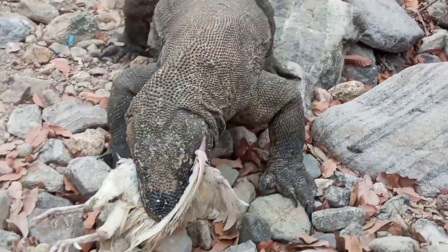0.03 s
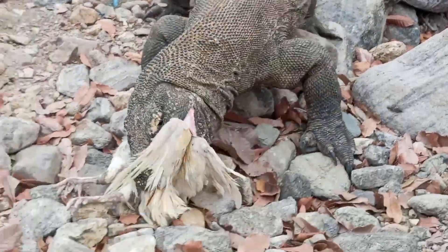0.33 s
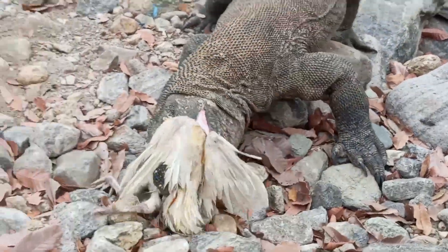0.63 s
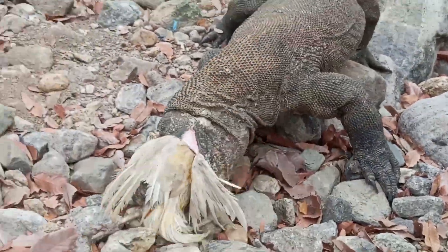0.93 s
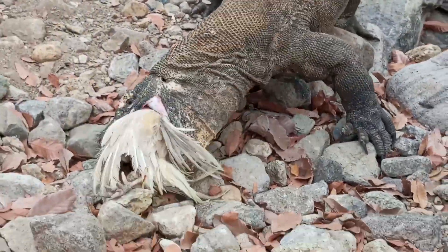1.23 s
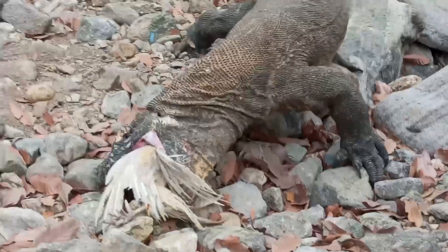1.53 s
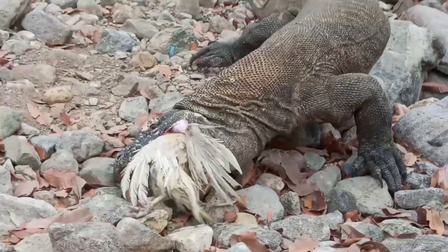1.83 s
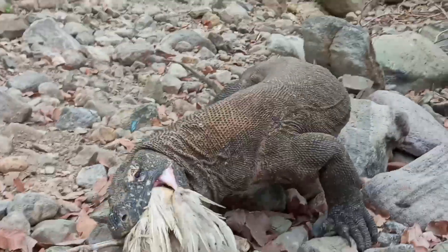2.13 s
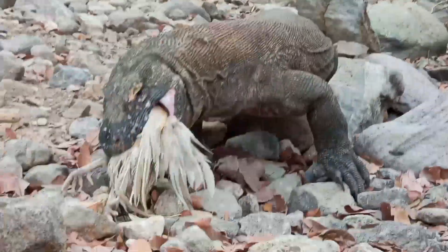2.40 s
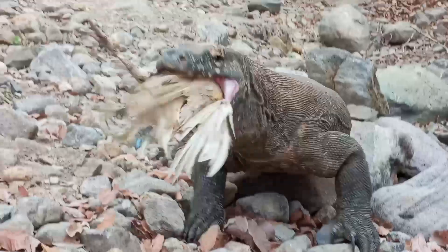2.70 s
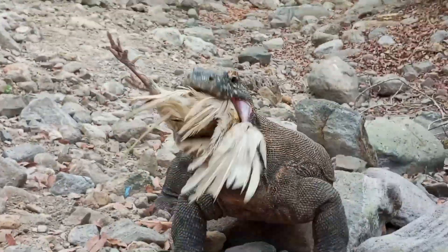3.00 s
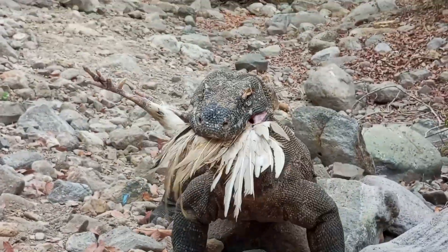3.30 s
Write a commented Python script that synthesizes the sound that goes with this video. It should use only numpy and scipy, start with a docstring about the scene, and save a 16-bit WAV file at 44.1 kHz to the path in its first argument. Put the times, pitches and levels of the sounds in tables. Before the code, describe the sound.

A large lizard scuffs and rustles over stones and dry leaves close by, dragging a dead bird in uneven shoves. Stones clack and twigs snap around 0.2 seconds, and leaves crackle sharply near 0.9. Gritty scraping continues, with soft low thuds and stone knocks at about 2 seconds. More cracks, scuffs and dull thumps follow from 2.5 to 3.2 as it swings the bird up, then ease over faint outdoor air.

```python
"""Outdoors, on loose stones and dry leaves, a large lizard close by hauls a dead bird, then swings it up.
Each shove of feet, belly and feathers is a scuff made of many tiny slips. Leaves and twigs crack,
stones knock together and the heavy body thuds on the ground. Nearby rocks bounce the sharper
sounds back, and faint outdoor air lies under it all."""
import sys
import numpy as np
from scipy import signal
from scipy.fft import rfft, irfft, next_fast_len
from scipy.io import wavfile
from scipy.ndimage import uniform_filter1d, map_coordinates

SR = 44100
rng = np.random.default_rng(int(sys.argv[2]) if len(sys.argv) > 2 else 0)


def output_pcm(signal):
    """Save a mono or channel-first signal as 16-bit PCM at the path in sys.argv[1].

    Samples are clipped to [-1, 1] before scaling.
    """
    pcm = np.clip(np.atleast_2d(signal).T, -1, 1) * 32767
    wavfile.write(sys.argv[1], SR, np.round(pcm).astype(np.int16))


N = 156555
SIZE = 8192  # samples in one short sound or filter


def amp(db):
    """Turn decibels into a gain."""
    return 10 ** (np.asarray(db) / 20)


def unit(x):
    """Scale a sound to a standard strength (rms 1)."""
    return x / np.sqrt(np.mean(x ** 2) + 1e-20)


def along(points, hz):
    """Read between the points of a tone curve."""
    f, db = np.transpose(points)
    return np.interp(np.log(hz + 1), np.log(f + 1), db)


def octaves(hz, centre_hz):
    """Distance from a centre pitch."""
    return np.log2((hz + 1) / centre_hz)


def hump(hz, centre_hz, width):
    """Gain of a resonance, width in octaves."""
    return 1 / (1 + (octaves(hz, centre_hz) / width) ** 2 / 2)


def coloured(x, gain):
    """Shape the tone of x by gain(hz)."""
    cepstrum = irfft(np.log(np.maximum(gain(np.fft.rfftfreq(SIZE, 1 / SR)), 1e-6)))
    cepstrum[1:SIZE // 2] *= 2
    cepstrum[SIZE // 2 + 1:] = 0  # ring after a hit, never before it
    return signal.fftconvolve(x, irfft(np.exp(rfft(cepstrum))))[:len(x)]


def wobble(rate):
    """A smooth curve through `rate` random values a second."""
    return map_coordinates(rng.standard_normal(SIZE), [np.arange(N) * rate / SR], mode="wrap")


def add(track, start_s, sound):
    """Mix a sound into the track."""
    part = track[max(round(start_s * SR), 0):][:len(sound)]
    part += sound[:len(part)]


def burst(fade_s, gain, attack_s, span_s, snap):
    """A clean click of strength `snap`, then rough noise that falls 20 dB in fade_s."""
    t = np.arange(SIZE) / SR
    push = rng.standard_normal(SIZE) * amp(-20 * t / fade_s) * (1 - np.exp(-t / attack_s))
    push[0] = snap * np.linalg.norm(push)
    return unit(coloured(push, gain)) * np.sqrt(span_s * SR / SIZE)  # energy of rms 1 held for span_s


# Tone of the still air: f/Hz, level/dB
AIR_TONE = [(20, -31), (40, -23), (60, -7.5), (95, -0.5), (160, -4), (350, -13.5), (1000, -15.5),
            (4000, -19), (9000, -15.5), (12500, -21.5), (16000, -33)]


def air():
    """A faint, low outdoor hush whose level wavers."""
    level = amp(-55 + 2.3 * wobble(12))
    hush = coloured(rng.standard_normal(N), lambda hz: amp(along(AIR_TONE, hz)))
    return level * unit(hush)


# Echoes off the rocks, changing as the lizard rears up: t/s, near echo's share, far echo's share
ROCK_ECHOES = [(.2, 0.076, .02), (1.1, 0.25, 0.019), (2.1, 0.19, 0.023), (2.75, 0.041, 0.51),
               (3.5, .03, 0.25)]


def with_rock_echoes(x, near_s=0.000865, far_s=0.002226, dull_above_hz=4600):
    """Two quick, dull echoes are subtracted from the sound and make it hollow."""
    t = np.arange(N) / SR
    times, near, far = np.transpose(ROCK_ECHOES)
    padded = next_fast_len(N + SIZE)
    hz = np.fft.rfftfreq(padded, 1 / SR)
    dull = rfft(x, padded) / (1 + (hz / dull_above_hz) ** 2)
    echo = lambda delay_s: irfft(dull * np.exp(-2j * np.pi * hz * delay_s), padded)[:N]
    return x - np.interp(t, times, near) * echo(near_s) - np.interp(t, times, far) * echo(far_s)


# Feet and body landing: t/s, relative level/dB, f/Hz, settling time/s
BODY_THUDS = [(.45, -48, 250, 0.056), (1.032, -43.5, 213, 0.024), (1.967, -35, 82, 0.037),
              (2.012, -37, 76.5, 0.07), (2.086, -35.5, 74.6, 0.032), (2.185, -50, 65, 0.045),
              (2.761, -36, 185, 0.012), (2.735, -45, 90, 0.078), (2.79, -40, 167, 0.15),
              (2.852, -41, 124, 0.045), (3.109, -41, 115, 0.06), (3.195, -40, 175, 0.08)]


def thuds():
    """The lizard's weight lands softly: the ground swings briefly and settles with a low noise."""
    out, t = np.zeros(N), np.arange(SIZE) / SR
    for start_s, db, pitch_hz, fade_s in BODY_THUDS:
        cycles = t * pitch_hz
        fading = amp(-20 * cycles / 1.2)  # 20 dB down after 1.2 swings
        swing = np.sin(2 * np.pi * cycles) * fading * (1 - np.exp(-2 * cycles))
        tone = lambda hz: hump(hz, pitch_hz, width=0.64) ** 2
        settling = burst(fade_s, tone, attack_s=0.0023, span_s=0.012, snap=0)
        add(out, start_s, amp(db) * (1.8 * swing + 0.83 * settling))
    return out


# The two ways a stone rings: multiple of its pitch, width/octaves, level/dB
STONE_RINGS = [(1.019, 0.1, 6.5), (2.3, 0.17, -16)]
# Stones knocking: t/s, level/dB, f/Hz, fade/s, level of the hollow tone/dB
STONE_KNOCKS = [ (0.125, -22, 2100, 0.0039, -27), (.131, -26, 1930, 0.021, -29),
                (.166, -27.5, 2050, 0.023, 2), (.182, -24, 2160, 0.034, -14),
                (0.333, -41, 1060, 0.0055, 14), (0.465, -32.5, 1380, 0.0045, -9),
                (0.469, -29, 1380, 0.0069, -1.5), (.476, -29.5, 1360, 0.0034, -0.5),
                (.674, -38.5, 1470, 0.017, 5), (1.036, -40, 1390, 0.011, 6),
                (1.351, -33.5, 1060, 0.015, -5), (1.352, -36.5, 1650, 0.012, -18),
                (1.576, -38, 1510, 0.0067, -8), (2.033, -33, 1320, 0.0084, 9),
                (2.097, -27, 1490, 0.0085, -1), (2.414, -32.5, 1630, 0.0096, 3),
                (2.539, -35.5, 1820, 0.0062, -12)]


def stones():
    """Loose stones tip together and ring briefly; the gap under each adds a lower, hollow tone."""
    out = np.zeros(N)
    for start_s, db, pitch_hz, fade_s, hollow_db in STONE_KNOCKS:
        ring = lambda hz: sum(amp(ring_db) * hump(hz, pitch_hz * ratio, width)
                              for ratio, width, ring_db in STONE_RINGS)
        tone = lambda hz: ring(hz) + amp(hollow_db) * hump(hz, 0.43 * pitch_hz, width=0.49)
        add(out, start_s, amp(db) * burst(fade_s, tone, attack_s=0.00014, span_s=0.0027, snap=0.79))
    return out


# Leaves and twigs breaking: t/s, level/dB, f/Hz, width/octaves, fade/s
TWIG_CRACKS = [ (0.125, -14.5, 5610, 0.086, 0.004), (0.125, -22, 3480, 0.12, 0.006),
               (.165, -28, 9600, 0.35, 0.0067), (0.1783, -16.5, 8300, 0.23, 0.0075),
               (0.261, -28, 6850, 0.27, 0.016), (0.3643, -28, 8400, 0.58, 0.0083),
               (0.403, -30, 9100, .3, 0.0055), (0.432, -27, 8100, 0.18, 0.013),
               (.467, -25, 3250, 0.12, .015), (.4893, -31.5, 7000, 0.99, 0.0045),
               (.535, -36, 3400, 0.34, 0.0055), (0.672, -33.5, 3400, 0.37, 0.0052),
               (0.7285, -35, 9200, 0.33, 0.0039), (.790, -45, 7500, .5, .008),
               (0.8486, -27, 5760, 0.78, .008), (0.8799, -22.5, 5650, 0.11, 0.005),
               (0.936, -14, 9000, 0.39, 0.0089), (0.9582, -18, 9000, 0.47, 0.0041),
               (.994, -25, 9200, 0.46, 0.01), (1.027, -27, 9200, 0.31, 0.004),
               (1.059, -27, 9400, 0.15, 0.0047), (1.12, -23.5, 3570, 0.3, 0.006),
               (1.223, -29.5, 3200, 0.88, .007), (1.245, -32.5, 9100, 0.17, 0.0062),
               (1.257, -30.5, 9300, 0.54, 0.0046), (1.506, -27.5, 3200, 0.56, 0.0037),
               (1.7738, -35.5, 9650, 0.14, 0.0058), (1.787, -32, 5500, .9, .007),
               (1.8377, -30, 8900, 0.21, 0.004), (1.874, -35, 9100, 0.45, .005),
               (1.9456, -24.5, 3330, 0.78, 0.0054), (1.962, -23, 6070, 0.071, 0.0037),
               (1.9895, -35, 9200, .4, .005), (2.0145, -31, 6000, .5, .004),
               (2.0352, -18.5, 7550, 0.52, 0.01), (2.2023, -27, 6350, 0.53, 0.0092),
               (2.2432, -25.5, 9500, 1, 0.0098), (2.2929, -26.5, 9700, 0.25, 0.011),
               (2.329, -32, 9100, .3, 0.0078), (2.367, -33, 8800, 0.43, .006),
               (2.5302, -28.5, 9500, 0.3, 0.0025), (2.5374, -24, 7950, 0.65, 0.01),
               (2.539, -18.5, 6140, 0.1, 0.0045), (2.5387, -14.5, 11700, 0.18, 0.0063),
               (2.7567, -21, 3780, 0.56, 0.0008), (2.854, -21, 3800, 0.23, 0.0053),
               (3.011, -33.5, 7000, 0.54, 0.005), (3.0328, -22, 5460, 0.1, 0.0044),
               (3.052, -28, 5700, 0.2, .006), (3.095, -31.5, 8000, 0.83, .006),
               (3.186, -29, 5640, 0.31, .007)]


def cracks(top_hz=18000):
    """Dry leaves and twigs give way, each with its own short, dead ring."""
    out = np.zeros(N)
    for start_s, db, pitch_hz, width, fade_s in TWIG_CRACKS:
        tone = lambda hz: hump(hz, pitch_hz, width) / (1 + (hz / top_hz) ** 8)
        add(out, start_s, amp(db) * burst(fade_s, tone, attack_s=0.00033, span_s=0.00071, snap=0.67))
    return out


def leaf_ticks(leaf_level, per_s=46, above_hiss_db=6, tries=200):
    """Leaf edges flick at random, as hard as the leaves are being brushed."""
    out = np.zeros(N)
    dice = rng.random((tries, 2))
    scatter = np.clip(rng.standard_normal((tries, 2)), -2, 2)
    for (when, chance), (extra_db, pitch_step) in zip(dice, scatter):
        if chance < per_s * N / SR / tries:
            pitch_hz = 8000 * 2 ** (0.55 * pitch_step)
            tone = lambda hz: hump(hz, pitch_hz, width=0.55)
            tick = burst(fade_s=0.0077, gain=tone, attack_s=0.0002, span_s=0.0011, snap=0.44)
            level = leaf_level[int(when * N)] * amp(above_hiss_db + extra_db)
            add(out, when * N / SR, level * tick)
    return out


def friction(tone, slips_per_s, scatter_db, smooth):
    """Tiny slips of uneven size over a smooth sliding noise."""
    sizes = amp(scatter_db * np.minimum(rng.standard_normal(N), 2))
    directions = np.sign(rng.standard_normal(N))
    slips = unit(sizes * directions * (rng.random(N) < slips_per_s / SR))
    sliding = smooth * rng.standard_normal(N)
    return unit(coloured(slips + sliding, lambda hz: amp(along(tone, hz))))


def patchy(x, depth_db, bands):
    """Resonances, each `bands` wide, come and go as different pebbles and leaves are touched."""
    spectrum = signal.stft(x, nperseg=512)[2]
    patches = uniform_filter1d(rng.standard_normal(spectrum.shape), bands, axis=0)  # blur in pitch
    patches = uniform_filter1d(patches, size=15, axis=1)  # blur in time
    return unit(signal.istft(spectrum * amp(depth_db * unit(patches)), nperseg=512)[1][:N])


# Tones of grinding grit, brushed leaves, crunching gravel and rubbed ground: f/Hz, level/dB
GRIT_TONE = [(700, -20.5), (1700, -11), (2800, -7.5), (3900, -3.5), (4600, 2), (5700, -1), (7200, -7),
             (10000, -12.5), (16000, -24)]
LEAF_TONE = [(2000, -37), (5000, -11.5), (7200, -6), (9200, -1), (10800, -4), (12500, -7.5), (16000, -7.5)]
GRAVEL_TONE = [(400, -20), (1000, -3.5), (1700, -3), (2500, -2.5), (3800, -2.5), (5400, -28), (9000, -32.5)]
RUB_TONE = [(30, -34), (70, -17.5), (200, -1), (380, -4.5), (650, -1), (900, -5.5), (1400, -4), (2500, -7),
            (8000, -43)]
# The lizard's shoves: peak t/s, rise/s, fall/s, relative grit level/dB,
# then, compared with the grit: leaf level/dB, gravel level/dB, rub level/dB
SHOVES = [ (.012, 0.015, 0.055, -53, 5.5, -1.5, -23), (.11, 0.023, 0.069, -51, 4, 6.5, -0.5),
          (0.177, 0.021, 0.017, -33, 8, 2, -2.5), (.255, 0.057, 0.053, -48, 9.5, 3, -4),
          (.37, 0.016, 0.036, -42, 7, -1, -13), (.42, 0.075, 0.09, -46, 5, 6.5, 0.5),
          (.52, 0.044, 0.11, -53, 7.5, 5.5, -8), (.648, 0.028, 0.04, -46, 0.5, -8, -1),
          (.74, .06, 0.051, -60.5, -9, 6, -1), (.83, 0.033, 0.11, -46, 0, -9, -3.5),
          (.937, 0.0096, 0.013, -29.5, 5.5, -6.5, -11.5), (.957, 0.014, 0.022, -32.5, 6.5, -2, -11.5),
          (1.005, .03, 0.097, -44.5, 4.5, 1, -8), (1.157, 0.053, 0.039, -38.5, -1.5, -1.5, -10),
          (1.219, 0.015, 0.024, -44.5, -6, -6, -3), (1.4, 0.096, 0.038, -45, 2.5, 3.5, -17),
          (1.495, 0.077, 0.052, -42, 4, 5, -11.5), (1.58, 0.023, 0.02, -43.5, 3.5, 2.5, -20),
          (1.68, 0.074, 0.12, -53.5, 5, 3, -11), (1.84, 0.062, 0.18, -43, -2, -3, -8),
          (1.975, 0.072, 0.029, -42.5, 5.5, 1.5, 0), (2.015, 0.061, 0.036, -41.5, -1.5, -11, 4),
          (2.099, 0.06, 0.053, -44, 3.5, -8, -0.5), (2.21, 0.15, 0.1, -50, 5, 2.5, -15),
          (2.31, 0.051, 0.096, -50.5, 3.5, -6, -4), (2.405, 0.043, 0.035, -46.5, 6.5, -1, -1.5),
          (2.48, 0.038, 0.028, -47, 0.5, -8, 2), (2.589, 0.039, 0.024, -52, 0.5, 3.5, -7),
          (2.70, 0.054, 0.046, -48, -1.5, -6, -3.5), (2.764, 0.033, 0.061, -37, -15, -4, -5),
          (2.815, 0.048, 0.041, -41.5, 4, -1.5, -2.5), (2.856, 0.02, 0.018, -29, -10, -5, -17),
          (2.935, 0.05, 0.049, -41.5, -4.5, -10, -8), (3.025, 0.027, 0.039, -41, 1, -2.5, -9),
          (3.112, 0.02, 0.049, -40, -5, -6.5, -14), (3.175, 0.049, 0.071, -37, -1, -9.5, -5),
          (3.29, 0.083, 0.11, -43.5, -1.5, -5.5, -6.5), (3.511, 0.0077, 0.01, -48, -2, 0, -11)]


def scuffs():
    """Each shove swells and fades, catching unevenly on grit, leaves, gravel and ground."""
    t, power = np.arange(N) / SR, np.zeros((4, N))
    for peak_s, rise_s, fall_s, db, leaf_db, gravel_db, rub_db in SHOVES:
        away_s = np.abs(t - peak_s)
        slope = np.where(t < peak_s, (away_s / rise_s) ** 1.7, (away_s / fall_s) ** 1.45)
        swell = amp(-np.minimum(7.5 * slope, 100))  # 7.5 dB down one rise or fall from the peak
        levels = amp([[db], [db + leaf_db], [db + gravel_db], [db + rub_db]])
        power += (levels * swell) ** 2
    grit, leaf, gravel, rub = np.sqrt(power)
    catch_db = 1.4 * wobble(70) + 1.07 * wobble(380)  # all four catch together
    grinding = friction(GRIT_TONE, slips_per_s=2500, scatter_db=-2, smooth=0.51)
    grinding = patchy(grinding, depth_db=2.5, bands=4)
    brushing = friction(LEAF_TONE, slips_per_s=2200, scatter_db=5, smooth=0.91)
    brushing = patchy(brushing, depth_db=2, bands=5)
    crunching = friction(GRAVEL_TONE, slips_per_s=1100, scatter_db=3.5, smooth=0.55)
    crunching = patchy(crunching, depth_db=3.5, bands=3)
    rubbing = friction(RUB_TONE, slips_per_s=900, scatter_db=1, smooth=0.55)
    rubbing = patchy(rubbing, depth_db=3, bands=2)
    return (grit * unit(amp(catch_db + 1.14 * wobble(200)) * grinding)
            + leaf * unit(amp(catch_db + 2.76 * wobble(260)) * brushing)
            + gravel * unit(amp(catch_db + 2.46 * wobble(120)) * crunching)
            + rub * unit(amp(catch_db + 0.76 * wobble(60)) * rubbing)
            + leaf_ticks(leaf))


def scene():
    """Everything is heard from straight ahead, alike in both ears."""
    dragging = amp(-2) * scuffs() + cracks() + stones()
    return np.tile(with_rock_echoes(dragging) + thuds() + air(), (2, 1))


# The microphone's fading treble: f/Hz, level/dB
MIC_TREBLE = [(10500, 0.5), (13000, -6.5), (16000, -12.5)]
# The microphone's bright peaks: f/Hz, width/octaves, level/dB
MIC_PEAKS = [(5765, 0.11, 5), (9020, 0.089, 5.5)]


def record(dry, top_hz=15850):
    """The microphone has two treble peaks, softens the highest sounds and keeps nothing above top_hz."""
    peaks_db = lambda hz: sum(db * np.exp(-(octaves(hz, centre_hz) / width) ** 2 / 2)
                              for centre_hz, width, db in MIC_PEAKS)
    tone = lambda hz: amp(along(MIC_TREBLE, hz) + peaks_db(hz))
    padded = next_fast_len(N + SIZE)
    spectrum = rfft([coloured(channel, tone) for channel in dry], padded)
    return irfft(spectrum * (np.fft.rfftfreq(padded, 1 / SR) < top_hz), padded)[:, :N]


dry = scene()
out = record(dry)
output_pcm(out)
```